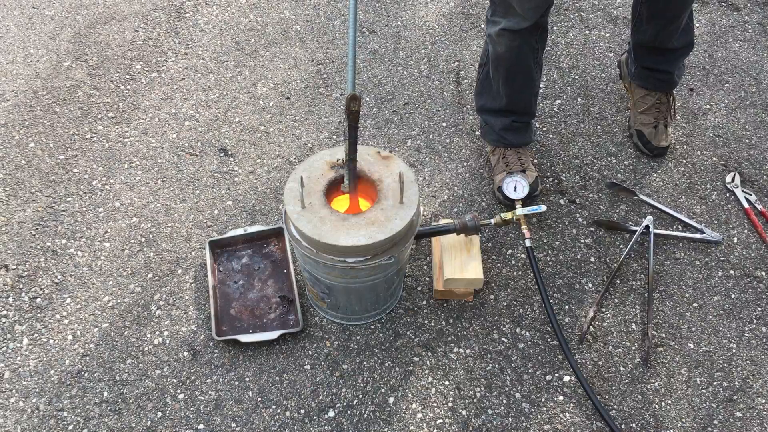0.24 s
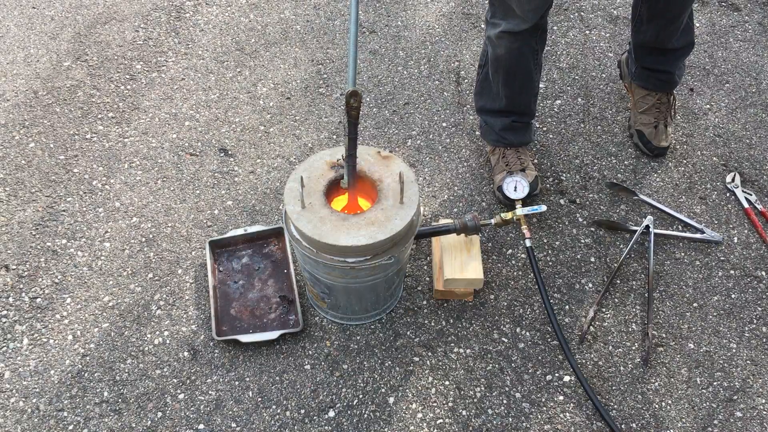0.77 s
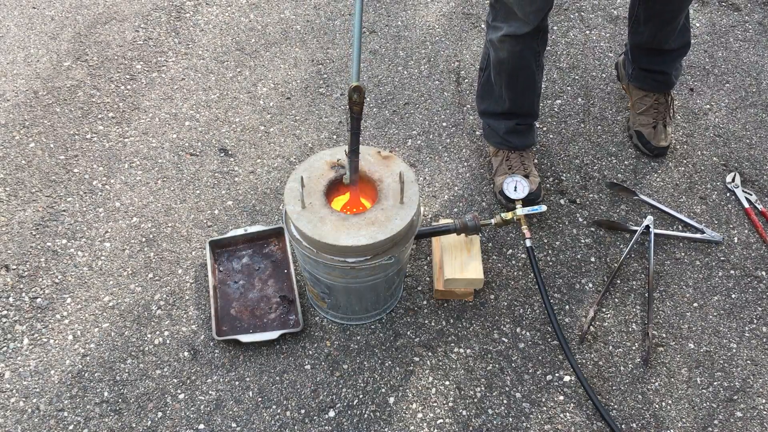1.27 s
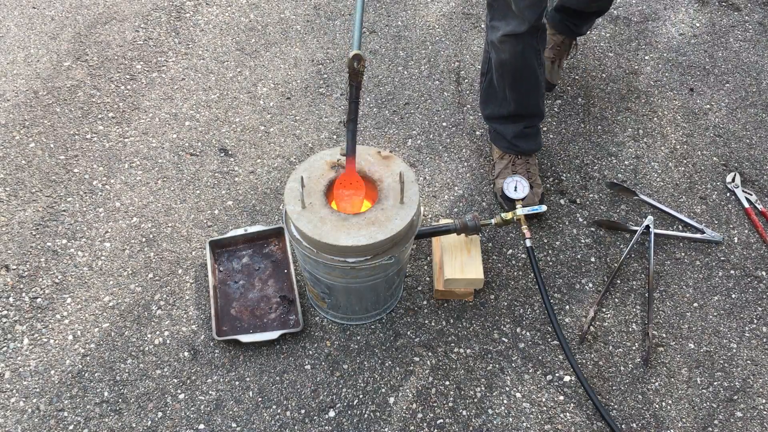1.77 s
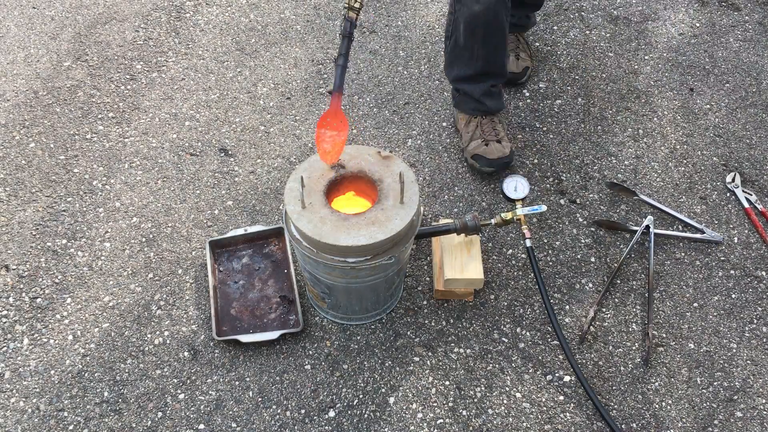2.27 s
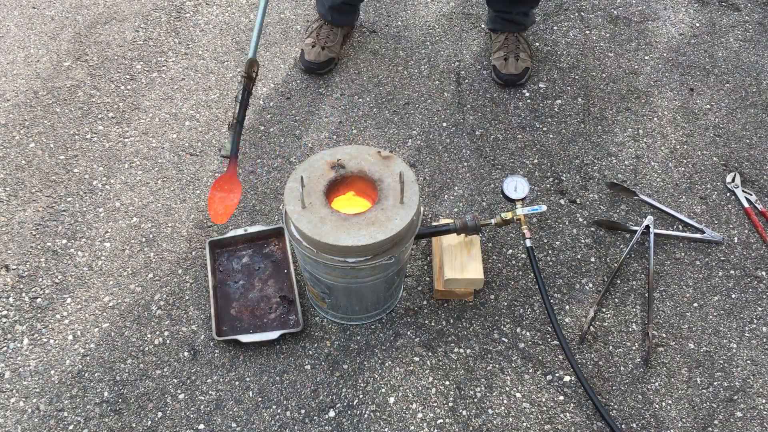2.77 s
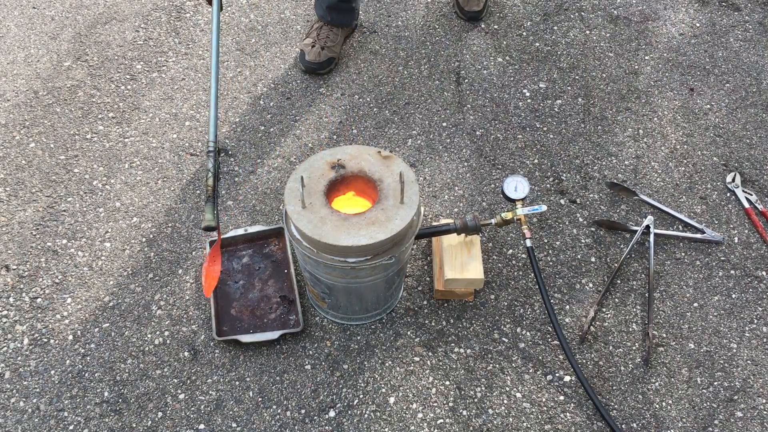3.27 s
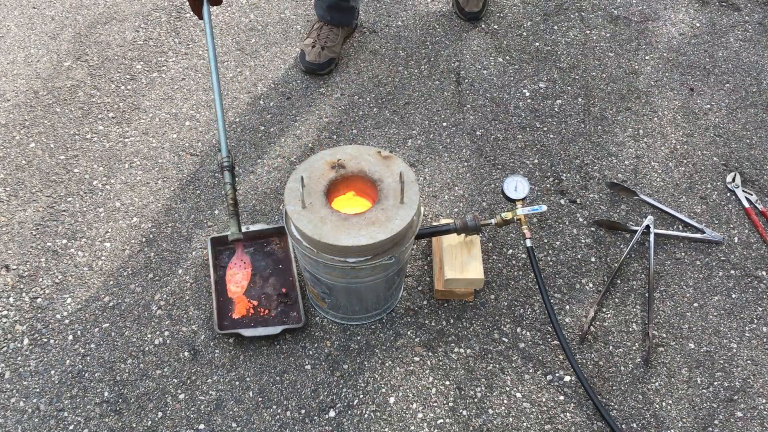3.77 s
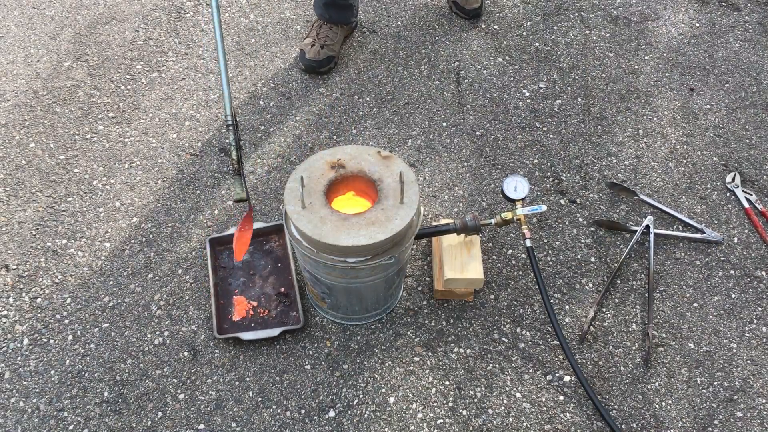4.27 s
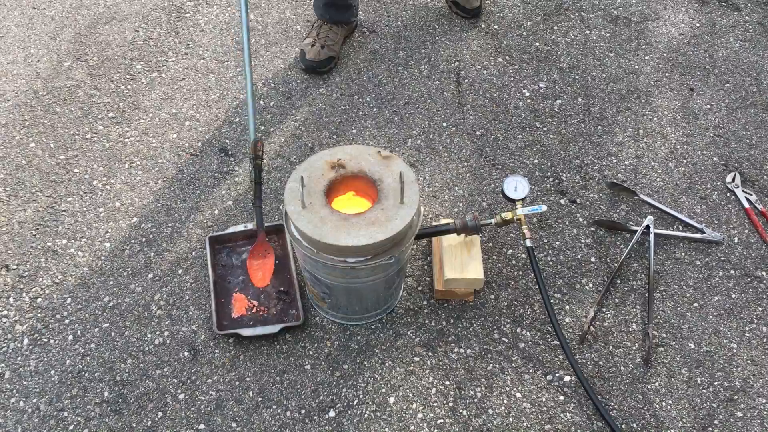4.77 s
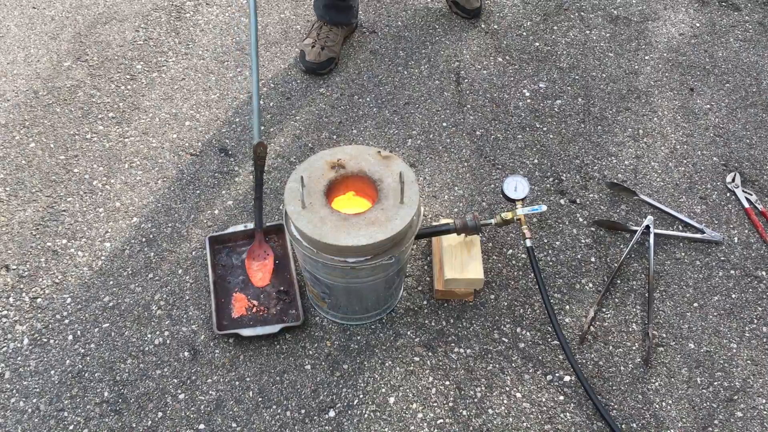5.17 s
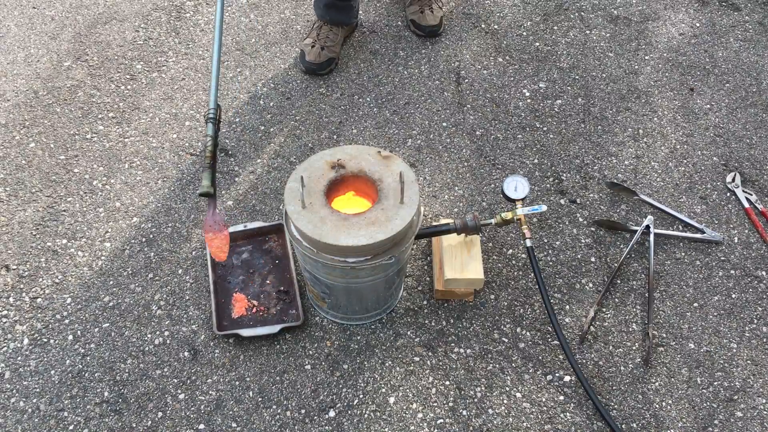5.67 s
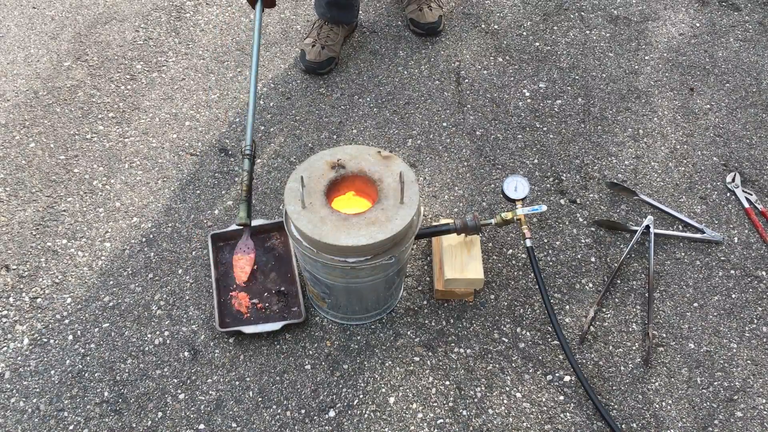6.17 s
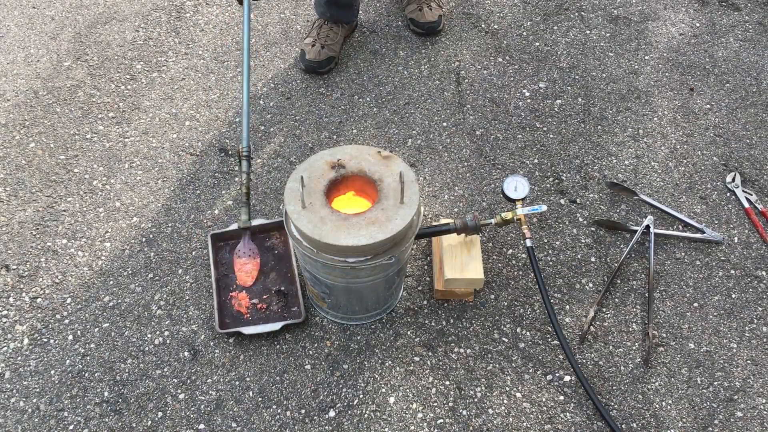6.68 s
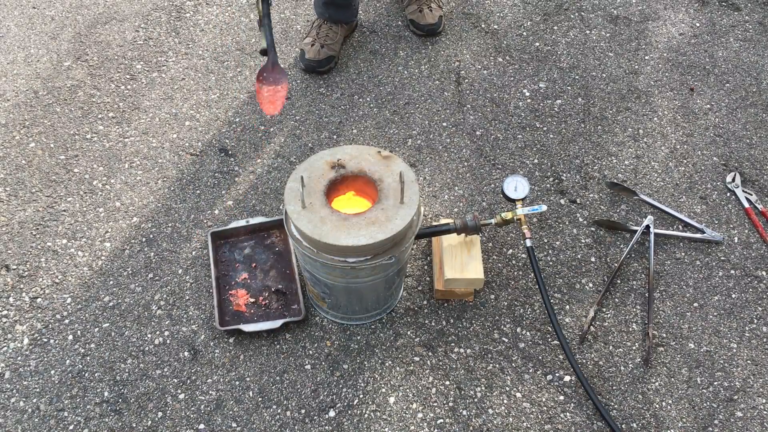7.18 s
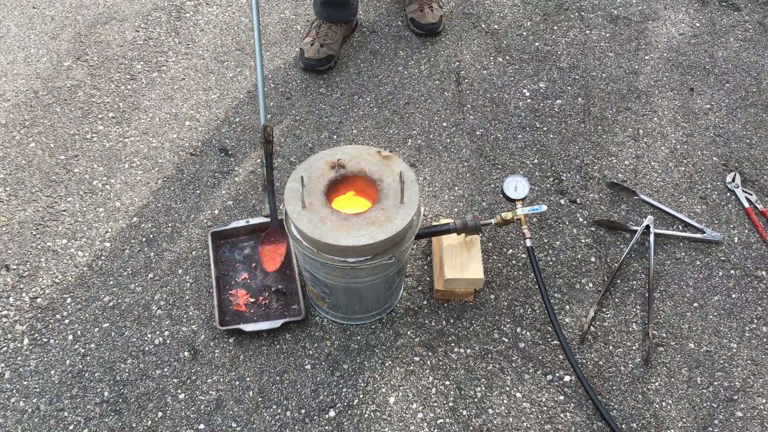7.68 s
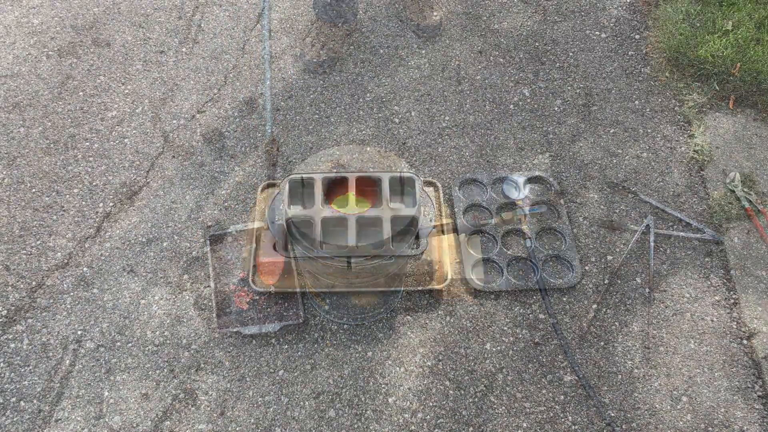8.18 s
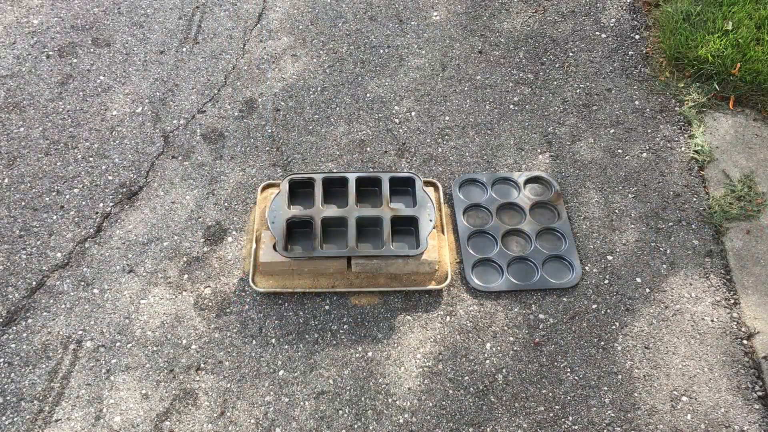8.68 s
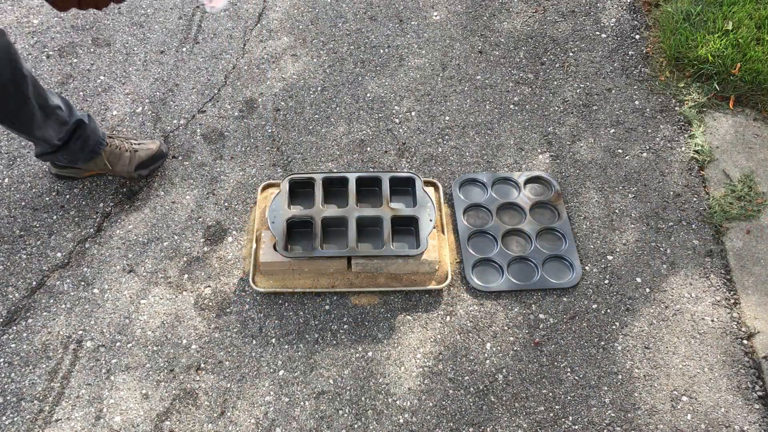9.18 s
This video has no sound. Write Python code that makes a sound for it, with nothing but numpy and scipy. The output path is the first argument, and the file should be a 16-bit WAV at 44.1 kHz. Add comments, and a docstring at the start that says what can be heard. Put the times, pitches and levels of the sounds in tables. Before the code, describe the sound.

A small gas furnace roars steadily outdoors while a metal spoon knocks sharply on a sheet-metal pan, then the roar fades to quiet insects.

```python
"""A small gas-fired furnace roars outdoors: shaped noise for the flame, resonant hiss for its gas jet.
A long steel spoon lifts dross out of the crucible, and the roar changes colour as the lid's hole opens.
The spoon then knocks on a sheet-metal pan, ringing its modes, and crumbs of dross tick into it.
Late on, the spoon scrapes the pan in a burst of tiny slips, and the roar fades away.
A distant rumble, an insect chorus, swept-sine insect ticks and bird chirps and a step on grit are left."""
import sys
import numpy as np
from scipy import signal
from scipy.fft import rfft, irfft, next_fast_len
from scipy.io import wavfile
from scipy.ndimage import map_coordinates

SR = 44100
rng = np.random.default_rng(int(sys.argv[2]) if len(sys.argv) > 2 else 0)


def waveform_to_disk(signal):
    """Save audio, clipped to [-1, 1], as 16-bit WAV at the path in sys.argv[1]."""
    frames = np.transpose(np.atleast_2d(signal))
    scaled = np.clip(frames, -1, 1) * 32767
    samples = np.round(scaled).astype(np.int16)
    wavfile.write(sys.argv[1], SR, samples)


N = 416304
TIME = np.arange(N) / SR   # the whole scene, in seconds
TAIL = TIME[:SR]   # one second, for single sounds
# the furnace fades out, and the background in, between these times
FADE_START_S, FADE_END_S = 8.02, 8.368


def from_db(db):
    """Decibels to gain."""
    return 10 ** (np.asarray(db) / 20)


def rms_one(x):
    """Scale to unit rms."""
    return x / np.sqrt(np.mean(x ** 2) + 1e-20)


def in_time(rows):
    """A curve's columns, joined by straight lines, at every sample."""
    seconds, *columns = np.transpose(rows)
    return np.squeeze([np.interp(TIME, seconds, column) for column in columns])


def ramp(start_s, end_s):
    """A straight rise from 0 to 1 between two times."""
    return np.clip((TIME - start_s) / max(end_s - start_s, .001), 0, 1)


def add(out, start_s, sound):
    """Mix a sound in at a time."""
    start = int(start_s * SR)
    out[start:start + len(sound)] += sound[:N - start]


def noise(spectrum, resonances=(), size=N):
    """Noise of rms 1 with a given colour and resonances, falling 30 dB an octave beyond the colour's ends."""
    length = next_fast_len(size)
    hz = np.maximum(np.fft.rfftfreq(length, 1 / SR), 1)
    points, levels = np.transpose(spectrum)
    db = np.interp(np.log(hz), np.log(points), levels)
    octaves_below, octaves_above = np.log2(points[0] / hz), np.log2(hz / points[-1])
    db = db - 30 * np.maximum(0, np.maximum(octaves_below, octaves_above))
    for centre, width, lift_db in resonances:
        db = db + lift_db / (1 + (2 * (hz - centre) / width) ** 2)
    white = rfft(rng.standard_normal(length))
    return rms_one(irfft(white * from_db(db), length)[:size])


def drift(rate_per_s):
    """Smooth random wandering of rms 1, through rate_per_s random points a second."""
    knots = rng.standard_normal(8192)
    return rms_one(map_coordinates(knots, [TIME * rate_per_s], order=3, mode="wrap"))


def dying(t60):
    """An envelope that loses 60 dB in t60 seconds."""
    return from_db(-60 * TAIL / max(t60, .001))


# Flame colour with the lid's hole covered and open. Each row: frequency in Hz, relative level in dB per Hz.
FLAME_COVERED = [(15, -46), (25, -25), (102, -8.5), (202, -3.5), (248, -5.5), (348, -5.5), (412, 0),
                 (541, -6), (687, -14.5), (773, -24.5), (917, -18), (1100, -24), (1200, -22.5),
                 (1350, -23.5), (1450, -33), (1880, -62), (3190, -120)]
FLAME_OPEN = [(15, -70), (25, -55), (41, -23), (97, -5.5), (173, -4), (220, -10), (284, -2), (399, 0.5),
              (653, -11.5), (760, -23), (856, -17), (964, -15), (1100, -24), (1350, -22.5), (1450, -34),
              (1880, -51), (3190, -120)]
# Hot gas rushing past the spoon in the hole. Each row: frequency in Hz, relative level in dB per Hz.
GAS_RUSH = [(1200, -8), (2050, -7.5), (2300, 6), (2500, -6), (2800, -13), (3080, -8), (3600, -12),
            (4500, -13), (5400, -12.5), (7000, -24)]
FLAME_DB = -21
# the spoon is drawn out of the lid's hole between these times
LIFT_START_S, LIFT_END_S = 1.65, 2.2


def burner(flutter_db=0.25, rush_db=-56.0, gap_share=0.045):
    """Turbulent flame in a resonant chamber, fed by the gas jet; opening the hole changes the resonance."""
    # a small gap is open even while the spoon sits in the hole
    opening = np.clip(gap_share + ramp(LIFT_START_S, LIFT_END_S), 0, 1)
    roar = np.sqrt(1 - opening) * noise(FLAME_COVERED) + np.sqrt(opening) * noise(FLAME_OPEN)
    roar = roar * from_db(FLAME_DB + flutter_db * drift(70))
    rush = from_db(rush_db) * (1 - opening) * noise(GAS_RUSH)
    return (roar + gas_jet() + rush) * (1 - ramp(FADE_START_S, FADE_END_S))


# Moves of the jet's treble. Each row: time in seconds, level in dB of the hiss, and of the sizzle
# above about 5 kHz, both before the fixed gains of gas_jet.
JET_MOVES = [(0.0, -57.5, -50), (0.56, -57.5, -51.5), (1.09, -56.5, -50), (2.0, -55.5, -49.5),
             (2.16, -57, -48), (2.47, -58, -50.5), (3.16, -58, -51), (3.88, -53.5, -46.5),
             (4.12, -57, -51.5), (4.36, -58.5, -47), (5.44, -55.5, -49), (8.0, -54.5, -49.5)]
# Gas jet colour. Each row: frequency in Hz, relative level in dB per Hz.
JET_COLOUR = [(1000, -10), (1480, -6), (1650, 10), (1930, 10.5), (2120, 2), (2900, -6), (4800, -8),
              (5500, -2.5), (7600, -4), (9300, 2), (10300, -3.5), (11000, -0.5), (15800, -0.5)]
# Resonances of the burner tube. Each row: centre in Hz, width in Hz, lift in dB.
TUBE_RESONANCES = [(2614, 77, 7), (3265, 360, 7.5), (4020, 220, 10.5), (4670, 160, 6), (5400, 230, 2.5),
                   (6680, 830, 5.5), (8380, 450, 3.5), (13300, 500, 0)]


def gas_jet(sputter_db=0.53, hiss_gain_db=5.5, sizzle_gain_db=0.5):
    """Gas hisses through the burner tube; its short waves are shaded apart from the long ones."""
    hiss_db, sizzle_db = in_time(JET_MOVES)
    jet = noise(JET_COLOUR, TUBE_RESONANCES) * from_db(sputter_db * drift(90))
    hiss = signal.sosfiltfilt(signal.butter(2, 5000, fs=SR, output="sos"), jet)
    sizzle = jet - hiss
    hiss = from_db(hiss_db + hiss_gain_db) * rms_one(hiss)
    return hiss + from_db(sizzle_db + sizzle_gain_db) * rms_one(sizzle)


# Spoon on pan. Each row: start in seconds, ring level in dB, t60 of the spoon's damping in seconds,
# clash level in dB, lift of the top octave in dB, edge touch against the slap in dB,
# chatter decay in seconds, rebound clash in dB, loss of the pan's main modes in dB.
SPOON_KNOCKS = [(3.648, -14.5, 1.5, -13.3, 3, -4, .008, -34, 0),
                (3.692, -22, 1.4, -37, 0, -7, .02, -40, -1), (4.031, -43, .5, -46, -11, -2, .02, -60, 2),
                (4.631, -30, 0.78, -35, -1, 0, 0.028, -28.5, 4),
                (6.184, -16, 0.83, -20.5, -3.5, -1.5, .012, -23, -2),
                (6.816, -22.5, 0.76, -21.5, 3, -2.5, .003, -42, -2.5),
                (8.008, -32, .5, -25.5, -4, 5, .02, -38, 7)]
# the edge touches first, then the bowl slaps down and chatters, and it rebounds once
EDGE_DULLER_DB, EDGE_CHATTER_S = 7.0, .003
SLAP_AFTER_S = .0055
REBOUND_AFTER_S, REBOUND_RING_DB, REBOUND_CHATTER_S = 0.041, -8.5, .007


def knocks(clash_t60=0.21, wash_t60=0.76, scatter_db=2.5):
    """Edge, bowl and rebound each excite a bright clash and the sheet's ring, blurred by chatter."""
    out = np.zeros(N)
    for start_s, ring_db, damped_t60, clash_db, top_db, edge_db, chatter_s, rebound_db, loss_db in SPOON_KNOCKS:
        # each contact: delay, ring dB, clash dB, chatter s
        edge = (0, ring_db + edge_db, clash_db + edge_db - EDGE_DULLER_DB, EDGE_CHATTER_S)
        slap = (SLAP_AFTER_S, ring_db, clash_db, chatter_s)
        rebound = (REBOUND_AFTER_S, rebound_db + REBOUND_RING_DB, rebound_db, REBOUND_CHATTER_S)
        for delay, body_db, bright_db, decay_s in (edge, slap, rebound):
            # the spoon stays on the sheet and damps it
            ring = pan_ring(loss_db, wash_t60=wash_t60, scatter_db=scatter_db) * dying(damped_t60)
            blow = from_db(body_db) * ring + from_db(bright_db) * clash(clash_t60, top_db)
            add(out, start_s + delay, signal.fftconvolve(blow, chatter(decay_s)))
    return out


def chatter(decay_s, per_s=450, bounce=0.27):
    """A first contact and the dying random micro-bounces after it; unit energy."""
    t = TAIL[:SR // 12]
    hits = rng.random(len(t)) < per_s / SR
    clicks = hits * rng.standard_normal(len(t)) * bounce * np.exp(-t / max(decay_s, .001))
    clicks[0] = 1
    return clicks / np.linalg.norm(clicks)


# Main modes of the pan. Each row: frequency in Hz, relative level in dB, free t60 in seconds.
PAN_MODES = [(852, -6.5, 0.44), (905, -8, 0.33), (1005, -1, 0.5), (1035, -3, 0.34), (1050, -2.5, 0.73),
             (1147, -32, 0.34), (1276, -9, 0.57), (1370, -2, 0.48), (1380, -4, 0.68), (1580, -25, 0.44),
             (1794, 4, 0.3), (1785, 3, 0.37), (1974, 2, 0.21), (2096, 3, 0.26), (2226, -1, 0.24),
             (2370, -14, 0.23), (2490, -8, .45), (2640, -15, .35), (2740, -10, 0.23), (2820, -14, 0.35),
             (3040, -9.5, .3), (3300, -4, 0.36), (3350, -19, .3), (3690, -12, .25), (4304, -13, 0.39),
             (5722, -16, 0.16), (5800, -17, 0.45), (6439, -12, 0.43), (6840, -17, .3), (9544, -10, .22)]
# The pan's crowded small modes. Each row: frequency in Hz, relative level in dB per Hz.
PAN_WASH_COLOUR = [(450, -31), (740, -2), (860, 2.5), (1020, 0), (1550, 0.5), (1800, 2.5), (2300, -1.5),
                   (3000, -6), (4500, -13.5), (7000, -10), (15000, -31)]


def pan_ring(loss_db=0.0, modes_db=-12.5, wash_db=-4.0, wash_t60=0.29, scatter_db=3.5):
    """One blow on the pan: main modes with strengths drawn afresh, as the spot struck varies, plus a wash."""
    strengths = from_db(scatter_db * rng.standard_normal(len(PAN_MODES)))
    strengths = strengths * rng.choice([-1, 1], len(PAN_MODES))
    modes = np.zeros(SR)
    for strength, (hz, db, t60) in zip(strengths, PAN_MODES):
        modes += strength * from_db(db) * np.sin(2 * np.pi * hz * TAIL) * dying(t60)
    wash = noise(PAN_WASH_COLOUR, size=SR) * dying(wash_t60)
    return from_db(modes_db - loss_db) * modes + from_db(wash_db) * wash


# Bright contact of hard things on the pan, also the scrape's rasp.
# Each row: frequency in Hz, relative level in dB per Hz.
CLASH_COLOUR = [(1200, -25), (2800, -3), (4600, -8), (5600, 3.5), (6600, 5), (8000, 0.5), (9500, 3.5),
                (10500, -1.5), (13000, 3), (15800, -2)]


def clash(t60, top_db=0.0, count=560):
    """Hundreds of close high modes ring for up to a quarter second, the highest dying first; starts near rms 1."""
    hz = np.linspace(1200, 15800, count) + rng.uniform(-13, 13, count)
    points, levels = np.transpose(CLASH_COLOUR)
    db = np.interp(hz, points, levels) + top_db * np.clip(np.log2(hz / 8000), 0, 1)
    gains = from_db(db) * rng.standard_normal(count)
    lives = max(t60, .005) * (7000 / hz) ** 0.25   # t60 of each mode
    phases = np.exp(2j * np.pi * rng.random(count))
    # each mode is a complex pole; its powers are built in coarse and fine strides
    poles = -np.log(1000) / (lives * SR) + 2j * np.pi * hz / SR
    stride = np.arange(int(np.sqrt(SR // 4)))
    coarse = np.exp(np.outer(stride * len(stride), poles))
    fine = np.exp(np.outer(poles, stride))
    ring = ((coarse * gains * phases) @ fine).imag.ravel()
    return np.pad(ring, (0, SR - ring.size)) * np.sqrt(2) / np.linalg.norm(gains)


# Crumbs of dross landing in the pan. Each row: start in seconds, level in dB, time to the one hop in seconds.
DROSS_CRUMBS = [(3.749, -33, .024), (3.795, -27.5, .029), (3.899, -33, .014), (6.306, -30, .026),
                (6.905, -36.5, .023), (7.105, -46, .026)]
HOP_LOSS_DB = 2.5


def crumbs(t60=0.15, ring_db=-29.0, top_db=2.5, chatter_s=.004):
    """Light, hard bits tick on the pan, hop once and barely set it ringing."""
    out = np.zeros(N)
    for start_s, db, hop_s in DROSS_CRUMBS:
        for delay, loss_db in ((0, 0), (hop_s, HOP_LOSS_DB)):
            tick = clash(t60, top_db) + from_db(ring_db) * pan_ring()
            tick = signal.fftconvolve(tick, chatter(chatter_s))
            add(out, start_s + delay, from_db(db - loss_db) * tick)
    return out


def scrape(slips_per_s=700, ring_db=0.5, rasp_db=0.0, t60=0.11, damped_t60=0.16):
    """Dense slips of the spoon rasp on the pan, whose sheet is damped by the pressure."""
    slips = (rng.random(N) < slips_per_s / SR) * rng.standard_normal(N)
    slips = rms_one(slips) * scrape_pressure()
    ring = pan_ring(loss_db=12.0) * dying(damped_t60)
    rasp = noise(CLASH_COLOUR, size=SR) * dying(t60)
    body = from_db(ring_db) * ring / np.linalg.norm(ring)
    body = body + from_db(rasp_db) * rasp / np.linalg.norm(rasp)
    return signal.fftconvolve(slips, body)[:N]


# one stroke along the pan that bites, eases and lets go
SCRAPE_START_S, SCRAPE_ATTACK_S, SCRAPE_HOLD_S, SCRAPE_RELEASE_S = 7.835, 0.011, 0.11, 0.069
SCRAPE_DB, SCRAPE_EASE_DB_PER_S = -29.5, 38


def scrape_pressure():
    """The stroke's force: a quick attack, a slowly easing hold and a release."""
    bite = SCRAPE_START_S + SCRAPE_ATTACK_S
    let_go = bite + SCRAPE_HOLD_S
    hold = from_db(SCRAPE_DB - SCRAPE_EASE_DB_PER_S * np.clip(TIME - bite, 0, SCRAPE_HOLD_S))
    return ramp(SCRAPE_START_S, bite) * hold * (1 - ramp(let_go, let_go + SCRAPE_RELEASE_S))


# Far rumble and insect chorus. Each row: frequency in Hz, relative level in dB per Hz.
RUMBLE_COLOUR = [(15, -35.5), (25, -23), (42, -13), (59, -3.5), (76, -6), (180, -18), (299, -31.5),
                 (737, -28.5), (990, -26), (2440, -39.5), (2830, -41.5), (3800, -50), (4940, -84),
                 (8360, -120)]
INSECT_COLOUR = [(3000, -26), (4000, -16), (4900, -11), (5400, -3.5), (6750, 0.5), (7600, -7), (8550, 0),
                 (9300, -8), (10400, -18), (15800, -19)]
# Runs of high insect ticks and lower bird chirps. Each row: start in seconds, length in seconds,
# spacing of the chirps in seconds, pitch in Hz, peak level in dB, fall in octaves.
TICK_AND_CHIRP_RUNS = [(8.31, .54, .063, 8950, -58, .02), (8.606, .1, .039, 4700, -59, .17),
                       (9.21, .1, .038, 4670, -59.5, .17)]
# Grit under a shoe. Each row: start in seconds, level in dB, t60 in seconds.
GRIT_CRUNCHES = [(9.366, -35, 0.0063), (9.405, -54, .04), (9.423, -39, .01), (9.433, -44, .08)]
# Colour of the grit. Each row: frequency in Hz, relative level in dB per Hz.
GRIT_SPECTRUM = [(1500, -27), (4500, -15), (6500, -2), (11500, -11), (15800, -12)]


def outdoors(rumble_db=-44.5, insects_db=-56.5, throb_db=0.5, chirp_s=.006):
    """Noise beds of rumble and insects, falling sine ticks and chirps, and grit bursts, faded in under the roar."""
    out = from_db(rumble_db) * noise(RUMBLE_COLOUR)
    out = out + from_db(insects_db + throb_db * drift(120)) * noise(INSECT_COLOUR)
    t = TAIL[:SR // 10] - 1 / 20   # time around the middle of a tick or chirp
    for start_s, length_s, spacing_s, hz, db, fall in TICK_AND_CHIRP_RUNS:
        pitch = hz * 2 ** (-fall * np.tanh(t / (2 * chirp_s)) / 2)
        swell = np.exp(-(t / chirp_s) ** 2 / 2)
        chirp = from_db(db) * swell * np.sin(2 * np.pi * np.cumsum(pitch) / SR)
        for middle_s in start_s + np.arange(0, length_s, spacing_s):
            add(out, middle_s + t[0], chirp)
    for start_s, db, t60 in GRIT_CRUNCHES:
        add(out, start_s, from_db(db) * noise(GRIT_SPECTRUM, size=SR) * dying(t60))
    return out * ramp(FADE_START_S, FADE_END_S)


def scene():
    """All sources summed dry into one channel, as in the open air."""
    return (burner() + knocks() + crumbs() + scrape() + outdoors())[None]


def record(dry):
    """The loudest peaks are rounded and the top is cut steeply above 15.75 kHz."""
    top_cut = signal.ellip(10, .1, 80, 15750, fs=SR, output="sos")
    return signal.sosfilt(top_cut, np.tanh(dry))


dry = scene()
out = record(dry)
waveform_to_disk(out)
```